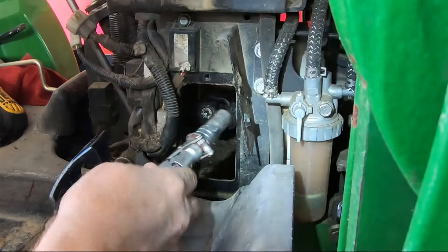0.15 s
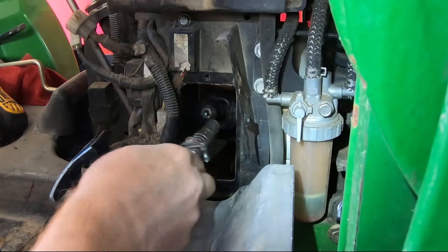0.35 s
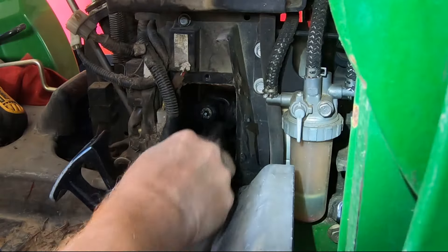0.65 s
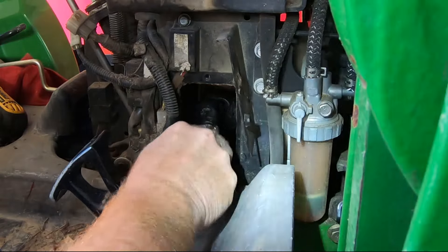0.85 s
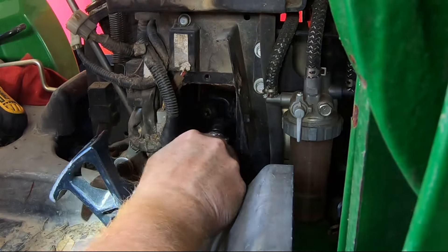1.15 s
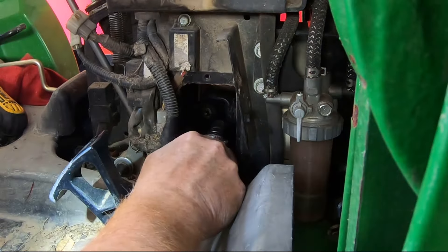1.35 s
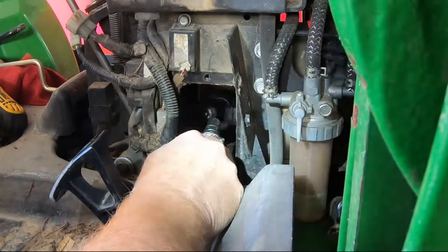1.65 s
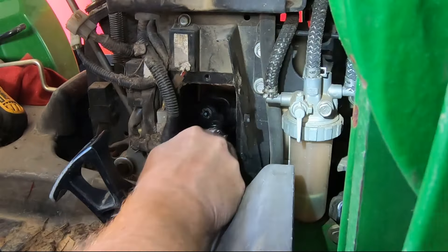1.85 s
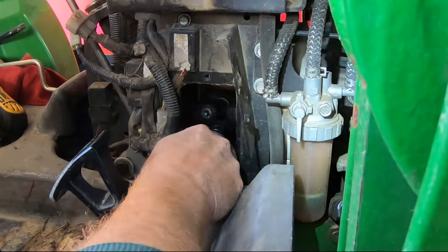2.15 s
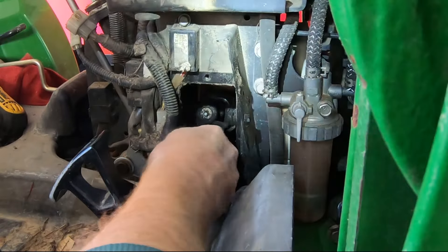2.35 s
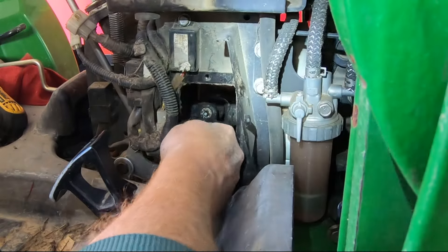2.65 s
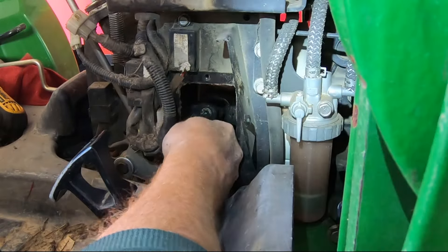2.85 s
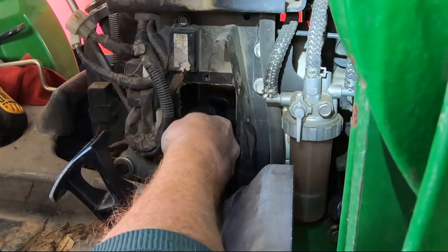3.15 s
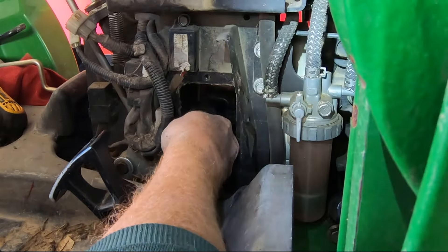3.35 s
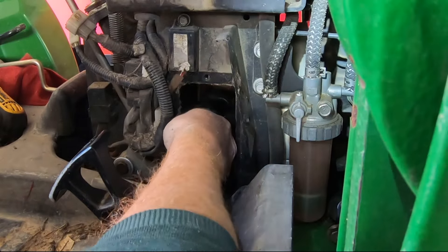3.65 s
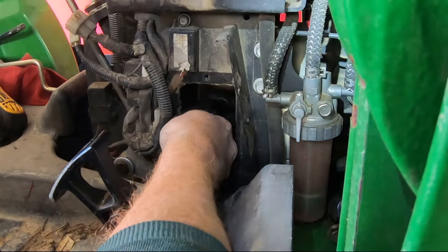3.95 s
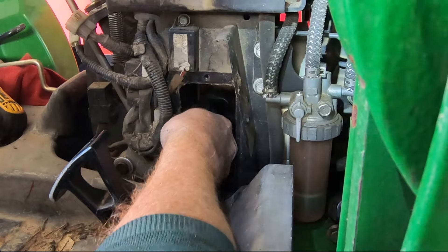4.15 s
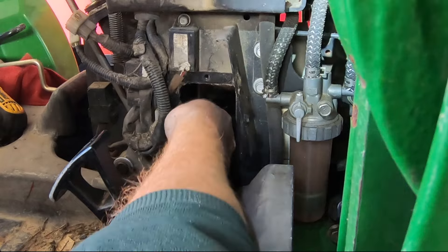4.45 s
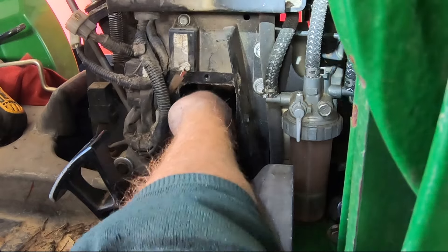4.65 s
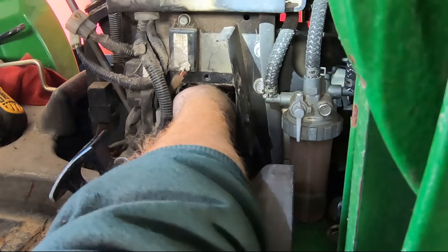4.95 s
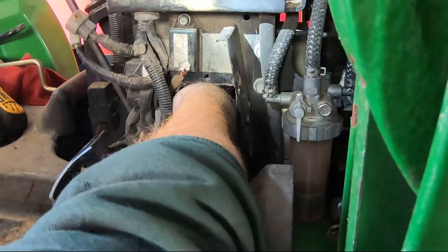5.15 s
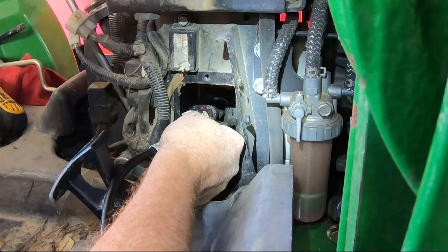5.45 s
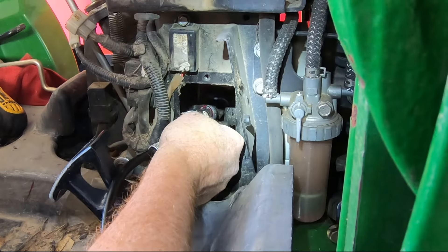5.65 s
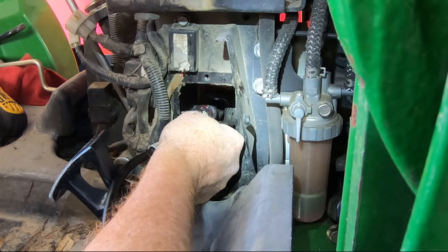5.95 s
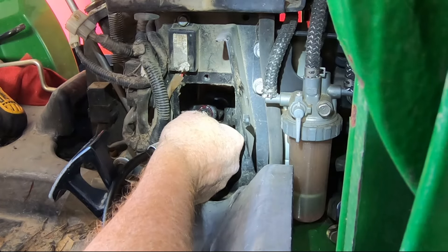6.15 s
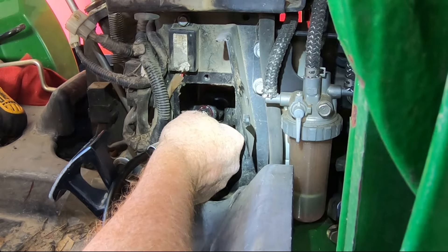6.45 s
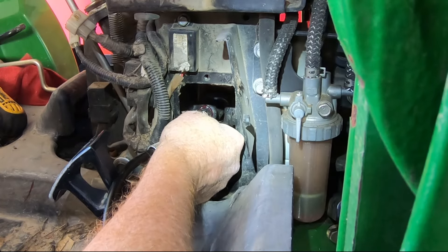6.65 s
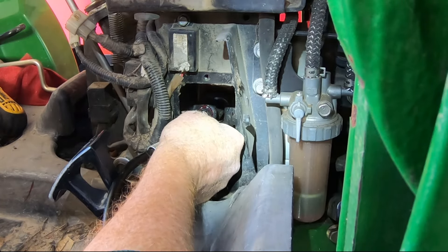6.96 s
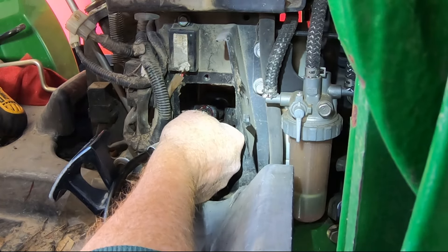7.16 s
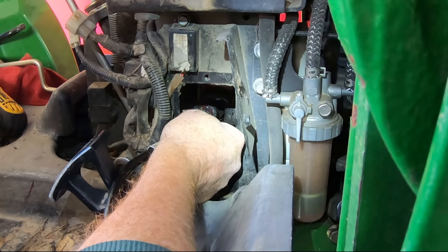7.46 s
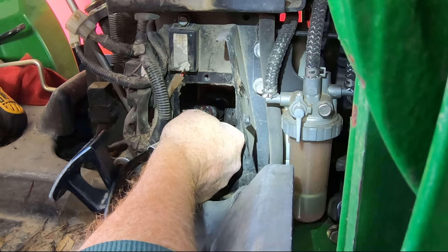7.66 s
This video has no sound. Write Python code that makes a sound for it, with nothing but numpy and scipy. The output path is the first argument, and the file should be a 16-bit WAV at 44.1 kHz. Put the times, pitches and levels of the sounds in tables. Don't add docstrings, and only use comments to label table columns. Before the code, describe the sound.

Soft skin and cloth rubs, small metal knocks and camera rumble, heavier on the right, sit over still indoor air. One hard steel snap stands out early, followed by sparse ticks. Later a geared electric motor bursts in, harsh and rattly, its pitch sagging and recovering with every knocking pump stroke, with squeal and hiss. It stops quickly with a short chatter and room echo; after a brief pause a second run begins and continues to the end.

```python
import sys
import numpy as np
from scipy import signal
from scipy.fft import rfft, irfft, next_fast_len
from scipy.io import wavfile
from scipy.ndimage import uniform_filter1d, map_coordinates

SR = 44100
rng = np.random.default_rng(int(sys.argv[2]) if len(sys.argv) > 2 else 0)


def generate_wav(signal):
    frames = np.transpose(np.atleast_2d(signal))
    scaled = np.clip(frames, -1, 1) * 32767
    pcm = np.round(scaled).astype(np.int16)
    wavfile.write(sys.argv[1], SR, pcm)


def makeup_ratio(level_db):
    decades = np.asarray(level_db, float) / 20
    return 10 ** decades


N = 343803

# [f/Hz, level/dB]
RUMBLE_COLOUR = [(9, -35.5), (15, -15), (32, 3.5), (55, -5), (80, 3.5), (95, -11), (118, -16), (180, -50.5),
                 (310, -120)]
AIR_COLOUR = [(59, -35.5), (100, -11.5), (166, 1.5), (243, -4), (507, -21), (790, -14.5), (1020, -23),
              (1370, -23), (1900, -33.5), (3180, -40), (4750, -34.5), (9320, -46.5), (15500, -74.5)]
# [t/s, rise/s, fall/s, level/dB, left minus right/dB]
JOLTS = [(0, .05, 0.071, -46.5, -13), (.13, 0.088, 0.13, -49.5, -11.5), (.91, 0.011, 0.19, -46, -9.5),
         (2.76, 0.063, 0.11, -57, -1), (3.06, 0.036, 0.062, -59, -4), (3.5, 0.22, 0.16, -53.5, -2),
         (3.951, 0.18, 0.18, -48.5, -8), (4.32, 0.019, 0.053, -47, -17.5), (4.82, 0.18, 0.23, -56.5, -2),
         (5.49, 0.038, 0.45, -54.5, -11.5), (5.97, 0.016, .06, -49.5, -5), (6.19, 0.056, 0.37, -54, -6.5),
         (7.14, 0.012, 0.18, -53.5, -10.5), (7.73, 0.039, 0.038, -52, -7)]
# [f/Hz, t60/s]
SHED_DECAY = [(200, 0.36), (700, 0.51), (1200, 0.45), (2600, 0.47), (5000, 0.4), (10000, 0.34)]

# [f/Hz, level/dB]
RUB_COLOUR = [(180, -42.5), (300, 4), (441, 3.5), (483, -0.5), (784, -4.5), (1490, -4.5), (1770, -8),
              (3200, -16.5), (4160, -45), (7040, -120)]
FIZZ_COLOUR = [(1470, -10), (2500, 0), (2940, -4), (3700, -3), (5360, -8), (6500, -7.5), (7500, -20.5),
               (9750, -45.5), (16500, -120)]
SHEEN_COLOUR = [(4120, -33.5), (7000, 3.5), (8570, 0.5), (10100, 2), (12000, -18.5), (13900, -15.5),
                (15500, -38.5)]
# [t/s, rise/s, fall/s, rub
# level/dB, fizz over rub/dB]
HAND_STROKES = [(.01, .05, 0.07, -59.5, -10), (4.4, .03, 0.032, -75, -7), (.14, 0.15, 0.17, -59.5, -3.5),
                (.42, 0.12, 0.4, -60, -3.5), (.6, 0.039, 0.073, -63.5, 9), (.7, 0.026, 0.035, -57.5, -8),
                (.92, 0.031, 0.059, -56, -13.5), (1.16, 0.022, 0.03, -40.5, -22),
                (1.31, 0.056, 0.15, -62.5, -3.5), (1.6, 0.063, 0.082, -58, -14),
                (1.71, 0.089, 0.16, -56.5, -7), (2.12, 0.31, 0.11, -55.5, -6),
                (2.39, 0.13, 0.14, -57.5, -5), (2.79, 0.15, 0.2, -56, -8.5), (2.963, 0.011, 0.037, -47, -7),
                (3.2, 0.48, 0.58, -66, -13.5), (3.27, 0.025, 0.035, -63, -8.5),
                (2.59, 0.077, 0.14, -65.5, -1.5), (3.58, 0.047, 0.28, -67.5, -7.5),
                (3.86, 0.029, 0.032, -81.5, 4), (4.28, 0.033, 0.037, -69, -11),
                (4.41, .04, 0.097, -73, -5.5), (4.58, 0.18, 0.3, -64, -8.5),
                (4.878, 0.043, 0.048, -56, -1.5), (5.11, 0.14, 0.25, -75.5, -26),
                (7.2, 0.11, 0.21, -75, -7)]
# [f/Hz, width/Hz, level/dB]
HOLLOW = [(800, 77, 4), (1256, 130, 0.5)]
# [t/s, level/dB]
SCUFFS = [(0.129, -45.5), (0.337, -47), (0.516, -45), (0.771, -48), (0.915, -48.5), (0.966, -51.5),
          (1.586, -53.5), (1.821, -55), (1.948, -54), (2.694, -56), (3.135, -52), (3.276, -55.5),
          (3.376, -56), (4.593, -53), (4.852, -49)]

# [t/s, level/dB, f/Hz, t60/s, left minus right/dB]
BUMPS = [(.127, -59, 500, 0.043, 3), (0.339, -47, 400, 0.041, 3), (.47, -48, 1640, 0.57, 3),
         (.572, -39, 950, 0.38, -3), (0.589, -40, 1860, 0.35, -5), (0.661, -45.5, 306, 0.065, 1),
         (.693, -46.5, 2000, 0.28, 4), (.775, -50.5, 696, 0.036, 10), (0.883, -50.5, 1630, 0.11, -4),
         (1.077, -51.5, 915, 0.071, 7), (1.698, -53, 6600, .02, 17), (2.022, -50, 4860, 0.018, 4.5),
         (3.5657, -43, 1820, 0.041, 7), (.89, -49.5, 142.3, .35, -6.5), (2.958, -45, 1360, 0.061, 4),
         (2.96, -39, 3200, 0.028, 2), (2.961, -43.5, 386, 0.093, -2), (3.455, -55, 5500, 0.018, 4),
         (3.565, -33.5, 3180, 0.025, 4.5), (3.623, -49, 1340, 0.033, -7), (3.834, -65, 4980, 0.022, -8),
         (4.5642, -47.5, 3250, 0.013, 2), (4.564, -49.5, 910, 0.025, 8), (2.813, -49, 5000, .02, 0),
         (5.027, -55.5, 3950, .022, -1)]
# [t/s, level/dB, f/Hz, t60/s]
TICKS = [(.195, -57, 5200, .03), (1.722, -49.5, 8400, 0.017), (3.074, -53.5, 3520, 0.015),
         (3.154, -62, 4990, 0.014), (3.206, -64, 3000, .018), (3.228, -55.5, 1980, 0.049),
         (3.305, -60, 3180, 0.037), (4.811, -53, 3990, 0.019)]
# [t/s, level/dB, f/Hz, t60/s]
STEEL_RINGS = [(1.125, -58, 3000, .02), (1.1378, -22, 1100, .03), (1.1385, -36, 4100, .03),
               (1.143, -40, 430, .05), (1.168, -39, 390, .13), (1.139, -35, 240, .05),
               (3.622, -52, 2370, .09), (3.5655, -40, 3420, .014), (3.5655, -50, 4400, .01),
               (3.845, -69, 2400, .12), (1.19, -42, 1520, .06), (1.48, -55, 900, .07),
               (4.8105, -60, 3600, .012), (4.8105, -60, 1320, .02), (5.027, -61, 4300, .012),
               (5.027, -62, 2400, .015), (3.455, -57, 4300, .015), (3.5657, -60, 9800, .02),
               (4.564, -51, 2400, .025), (.128, -50, 260, .05), (.655, -50, 270, .04)]
# [t/s, level/dB]
SNAP = [
    (1.138, -15.5),
]
# [f/Hz, level/dB]
CRACK_COLOUR = [(60, -41.5), (150, -7.5), (400, -9), (800, -6), (1300, 0), (1900, -7.5), (2400, -5.5),
                (4000, -12), (4700, -19), (6600, -29.5), (15000, -70.5)]
# [f/Hz, width/Hz, level/dB]
BRACKET = [(188.7, 480, -3), (405, 15, 8), (790, 70, -1), (1201, 120, -19.5), (1460, 68, -6),
           (2250, 380, -4)]

# [f/Hz, width/Hz, level/dB]
HOUSING = [(950, 110, 3), (1060, 39, 4.5), (1290, 200, -1), (1464, 19, 6), (1754, 27, 3), (2180, 130, 2.5),
           (2508, 40, 4), (2920, 36, -3), (3250, 100, 5.5)]
# [f/Hz, level/dB]
GEAR_COLOUR = [(150, -60), (250, -18), (330, -7.5), (600, -3.5), (1000, -1), (1500, -5), (3300, -6),
               (4000, -9.5), (5000, -14.5), (6000, -13.5), (10200, -24), (14200, -40), (15500, -65)]
STRAIN_COLOUR = [(2000, -38.5), (3500, 2), (4600, 1), (5400, 3.5), (6000, 0), (6350, -9), (6550, 7.5),
                 (6800, -9.5), (10000, -16), (15000, -32.5)]
KNOCK_COLOUR = [(250, -44.5), (400, 11.5), (600, 9.5), (1200, 4), (1500, 6.5), (2500, -6), (3300, -0.5),
                (7000, -25.5), (15000, -60.5)]
# [f/Hz, left minus right/dB]
GUN_ALIKE = [(60, 0.15), (150, 0.56), (380, 1), (950, 0.66), (2380, 0.93), (5980, 0.75), (15000, -0.3)]
GUN_PAN = [(60, -6.5), (150, 3), (380, -1), (950, -3), (2380, -1), (5980, -3), (15000, 6)]
# [on t/s, off t/s, spin-up/s, gear level/dB, extra whine as the load is taken up/dB]
PULLS = [
    (5.308, 6.631, .024, -32, 25),
    (7.33, 8, 0.018, -31.5, -2),
]
# [t/s, level/dB]
SWITCH_CLICKS = [(5.299, -55), (5.308, -25.5), (6.97, -57.5), (7.325, -34)]
# [t/s, level/dB]
CRANK_KNOCKS = [(5.645, -16), (5.871, -15.5), (6.089, -15), (6.307, -12.5), (6.526, -16.5), (7.503, -15),
                (7.727, -16)]
SILENT_TURNS = [5.19, 5.408, 6.746, 7.285, 7.95]
# [f/Hz, level/dB, t60/s]
FRAME_MODES = [(470, -18.5, .05), (685, -14, 0.047), (915, -13.5, 0.044), (1122, -10.5, 0.093),
               (1414, -8.5, .05), (2000, -15, 0.017)]
SHAFT_ORDERS = [1, 12, 15, 15, 10]
VOICE_LAGS = (0, .8, 1.2, 1.2, .4, 1.9)
# [rest level/dB, then peaks of (t after the knock/s, rise/s, fall/s, level/dB)]
VOICES = [
    (-66, (.165, .055, .035, -53)),
    (-68, (.16, .018, .012, -44), (.203, .016, .018, -39.5)),
    (-70, (.056, .018, .022, -44)),
    (-64, (.14, .025, .04, -46.5)),
    (-70, (.052, .014, .025, -44)),
    (-75, (.022, .012, .022, -36)),
]
# [pinion 12/dB, pinion 15 early/dB, pinion 15 late/dB, pinion 10/dB, squeal/dB]
TURN_MOODS = [(0, 0, 0, 0, 0), (-1, -9, -1, -9, 0), (-1, 0, -1, 0, 0), (0, -5, -4, -1, -1),
              (0, -5, 3, -5, -1), (-1, 0, 0, 0, -3), (-12, -3, -8, 0, 0), (0, 0, 0, 0, 0),
              (-18, -9, -8, -9, 0), (0, 3, -6, -4, -3), (0, -3, 0, -3, 0), (0, 0, 0, 0, 0)]
# [t after the knock/s, level/dB, f/Hz]
BACKLASH = [
    (.068, -21.5, 2226),
    (.091, -18, 1047),
]
# [t/s, level/dB, f/Hz]
LOOSE_CLACKS = [(5.356, -40, 1000), (5.387, -20.5, 3320), (5.44, -15, 3250), (5.455, -19.5, 1045),
                (6.017, -25, 1050), (7.39, -38.5, 970), (7.433, -19.5, 1110), (7.711, -15.5, 1060)]
# [t/s, level/dB, f/Hz]
TOOTH_CATCHES = [(5.365, -23, 930), (5.386, -22, 1000), (5.405, -14.5, 1030), (5.508, -16, 1110),
                 (5.531, -28, 939), (5.561, -23, 970), (5.595, -23, 1090), (5.646, -25, 1230),
                 (5.742, -10.5, 970), (5.78, -14, 970), (5.836, -36, 1030), (5.871, -28, 1090),
                 (5.959, -15, 1107), (6.0585, -10, 950), (6.09, -20, 1170), (6.152, -17, 1120),
                 (6.179, -12, 924), (6.274, -30.5, 1040), (6.308, -16, 1060), (6.364, -18.5, 1060),
                 (6.395, -23, 1105), (6.462, -29.5, 1020), (6.528, -25.5, 1090), (6.57, -23, 1400),
                 (6.586, -20.5, 1150), (6.611, -23.5, 1030), (7.381, -27.5, 915), (7.395, -34, 970),
                 (7.505, -24, 1260), (7.598, -23, 1090), (7.625, -19, 940), (7.671, -30, 1010),
                 (6.59, -24, 1500), (6.607, -23, 1780), (6.625, -24, 1800), (6.64, -29, 1450),
                 (6.645, -30, 1800)]
BRIGHT_CATCHES = [(5.3482, -38, 2200), (5.3652, -20, 2200), (5.5224, -20, 3110), (5.6067, -30, 3420),
                  (5.6486, -21, 2920), (5.7194, -15, 2190), (5.8701, -18, 3250), (5.9863, -26, 3240),
                  (6.068, -24.5, 3240), (6.0918, -18.5, 3170), (6.1539, -16.5, 2180), (6.3096, -14, 3250),
                  (6.5285, -22, 3200), (6.5904, -16, 2200), (6.6114, -15.5, 3250), (7.51, -17, 3210),
                  (7.5787, -12, 2170), (7.6144, -20, 2980)]


def unit(x):
    return x / np.sqrt(np.mean(x ** 2) + 1e-20)


def along(points, hz):
    f, v = np.transpose(points)
    return np.interp(np.log(hz + 1), np.log(f + 1), v)


def wobble(rate):
    knots = rng.standard_normal(int(N * rate / SR) + 4)
    return map_coordinates(knots, [np.arange(N) * rate / SR])


def filtered(x, response):
    m = next_fast_len(x.shape[-1] + 8192)
    return irfft(rfft(x, m) * response(np.fft.rfftfreq(m, 1 / SR)), m)[..., :x.shape[-1]]


def rush(gain, alike, grain_db=0, grain_hz=300, patchy_db=0):
    z = signal.stft(rng.standard_normal((2, N)), nperseg=512)[2]
    field = uniform_filter1d(rng.standard_normal(z.shape[1:]), 6, 0)
    field = uniform_filter1d(field, 10, 1)
    pair = signal.istft(z * makeup_ratio(patchy_db * unit(field)), nperseg=512)[1][:, :N]
    pair = pair * makeup_ratio(grain_db * wobble(grain_hz))

    def spread(hz):
        turn = np.arccos(np.clip(along(alike, hz), -1, 1)) / 2
        return gain(hz) * [np.cos(turn), np.sin(turn)]

    mid, side = filtered(pair, spread)
    return unit(np.array([mid + side, mid - side]))


def add(track, s, sound):
    part = track[..., round(s * SR):][..., :sound.shape[-1]]
    part += sound[..., :part.shape[-1]]


def burst(gain, t60, attack=0.0014):
    t = np.arange(SR // 4) / SR
    puff = filtered(rng.standard_normal(len(t)), gain)
    puff = puff * makeup_ratio(-60 * t / t60) * (1 - np.exp(-t / attack))
    return puff / np.abs(puff).max()


def ring(hz, t60, attack):
    t = np.arange(SR // 10) / SR
    return np.sin(2 * np.pi * hz * t) * makeup_ratio(-60 * t / t60) * (1 - np.exp(-t / attack))


def peak(hz, width):
    return lambda f: f * width / np.hypot(hz * hz - f * f, f * width)


def modes(rows, f):
    return sum(makeup_ratio(db) * peak(hz, width)(f) ** 2 for hz, width, db in rows)


def bell(x, at, rise, fall, edge=2):
    return np.exp(-np.abs((x - at) / np.where(x < at, abs(rise), abs(fall))) ** edge)


def swells(rows, db, rest_db, edge):
    t = np.arange(0, N / SR + .002, .002)
    power = makeup_ratio(rest_db) ** 2
    for row, level_db in zip(rows, db):
        power = power + (makeup_ratio(level_db) * bell(t, *row[:3], edge)) ** 2
    return np.interp(np.arange(N) / SR, t, np.sqrt(power))


def rumble():
    jolt_db, pan_db = np.transpose(JOLTS)[3:]
    ports = [swells(JOLTS, jolt_db - 0.5 + side * pan_db / 2, -69, 1.3) for side in (1, -1)]
    lumps = rush(lambda f: makeup_ratio(along(RUMBLE_COLOUR, f)), [(50, 0.11)], grain_db=-0.5, grain_hz=10)
    return np.array(ports) * lumps


def shed_air():
    t = np.arange(N) / SR
    alike = [(150, 0.82), (300, 0.11), (2000, 0.12), (8000, 0.23)]
    air = rush(lambda f: makeup_ratio(along(AIR_COLOUR, f)), alike, grain_db=0.7, grain_hz=10.0, patchy_db=1.2)
    level_db = -59.5 + 0.5 * wobble(1.7)
    level_db += 2.5 * bell(t, 0.74, 1.9, .7)
    level_db -= bell(t, 4.03, 0.26, 0.32)
    level_db -= 4.5 * bell(t, 6.91, 0.24, 0.21)
    return makeup_ratio(level_db) * air


def shed(x):
    hz, t, z = signal.stft(rng.standard_normal((2, SR * 2 // 3)), SR, nperseg=256)
    tail = signal.istft(z * makeup_ratio(-60 * t / along(SHED_DECAY, hz)[:, None]), SR, nperseg=256)[1]
    late = np.pad(x, ((0, 0), (300, 0)))
    return signal.fftconvolve(late, tail / np.linalg.norm(tail[0]), axes=1)[:, :N]


def hollow(f):
    return 1 + modes(HOLLOW, f)


def hand():
    rub_db, over_db = np.transpose(HAND_STROKES)[3:]
    rub = rush(lambda f: makeup_ratio(along(RUB_COLOUR, f)) * hollow(f), [(500, 0.097), (3000, 0.074)],
               grain_db=1.5, grain_hz=95.5, patchy_db=1.45)
    fizz = rush(lambda f: makeup_ratio(along(FIZZ_COLOUR, f)), [(3000, 0.46)],
                grain_db=1.5, grain_hz=155.0, patchy_db=1.5)
    sheen = rush(lambda f: makeup_ratio(along(SHEEN_COLOUR, f)), [(9000, .3)],
                 grain_db=1.0, grain_hz=148.3, patchy_db=0.8)
    rest_db, edge = -92.5, 1.49
    rubbing = swells(HAND_STROKES, rub_db + 1.5, rest_db, edge)
    fizzing = swells(HAND_STROKES, rub_db + over_db + 2.0, rest_db - 8, edge)
    shine = makeup_ratio(-14 + 5 * bell(np.arange(N) / SR, 2.7, 0.48, 0.3))
    return rubbing * rub + fizzing * (fizz + shine * sheen)


def coupler_snap(out):
    def crack(f):
        return makeup_ratio(along(CRACK_COLOUR, f))

    for s, db in SNAP:
        add(out, s, makeup_ratio(db + 1.1) * burst(crack, 0.032, 0.00039))
        add(out, s, makeup_ratio(db - 11.5) * burst(lambda f: modes(BRACKET, f) + 0.1 * crack(f), 0.2, 0.00068))
        spray = [burst(lambda f: peak(3000, 3500)(f) ** 3, .26, .002) for port in range(2)]
        add(out, s, makeup_ratio(db - 18) * np.array(spray))


def steel():
    out = np.zeros((2, N))
    # pan in dB, band width over pitch
    contacts = [(*row, 0.8) for row in BUMPS] + [(*row, 7, 0.4) for row in TICKS]
    for s, db, hz, t60, pan_db, wide in contacts:
        tick = burst(lambda f: peak(hz, wide * hz)(f) ** 3 / (1 + (f / 13500) ** 4), max(t60, .005), 0.00028)
        add(out, s, makeup_ratio(db + pan_db / 2 * np.array([[1], [-1]])) * tick)
    for s, db, hz, t60 in STEEL_RINGS:
        add(out, s, makeup_ratio(db) * ring(hz, t60, 0.00032))
    for s, db in SCUFFS:
        add(out, s, makeup_ratio(db - 2) * burst(lambda f: hollow(f) ** 2 * peak(900, 900)(f), 0.034, .0006))
    coupler_snap(out)
    return out


def housing(f):
    return 1 + modes(HOUSING, f)


def gear_colour(f):
    return makeup_ratio(along(GEAR_COLOUR, f)) * housing(f)


def trigger(t):
    speed, level_db, extra_db = np.full(N, .03), np.full(N, -120.), np.zeros(N)
    held, held_s, freed_s, brake_s = .912, .155, .05, 0.074
    for on, off, spin, db, sing_db in PULLS:
        u = np.maximum(t - on, 0)
        stop = np.clip((t - off) / brake_s, 0, 1)
        share = held * (1 - np.exp(-u / spin))
        share += .035 * bell(u, .112, .03, .025)
        share += (1 - held) * np.clip((u - held_s) / freed_s, 0, 1)
        share *= 1 - stop
        speed = np.maximum(speed, share)
        level_db = np.maximum(level_db, db + 24 * np.log10(share + 1e-9) - 32 * stop ** 2)
        singing = bell(u, .125, .028, .045, 4) if sing_db > 0 else u * (u < held_s) > 0
        unmeshed = u * (u < .1) > 0
        extra_db += sing_db * singing - 20 * unmeshed
    return speed, level_db, extra_db


def turning(since, at, rise, fall):
    return bell(since, at, rise, fall) + bell(since - .22, at, rise, fall)


def gear_noise(since, speed, level_db):
    shake = rush(gear_colour, GUN_ALIKE, grain_db=1.4, grain_hz=255.1, patchy_db=1.8)
    strain = rush(lambda f: makeup_ratio(along(STRAIN_COLOUR, f)), [(5000, 0.24)],
                  grain_db=1.0, grain_hz=400, patchy_db=2.5)
    dull = filtered(shake, lambda f: 1 / (1 + (f / 2200) ** 4))
    bass = filtered(dull, lambda f: 1 / (1 + (f / 760) ** 4))
    bright = np.minimum(speed / 0.89, 1) ** 4 * (shake - dull)
    shake = makeup_ratio(1.5 * wobble(130)) * (dull - (1 - speed ** 6.8) * bass) + bright
    rattle_db = 2.5 + turning(since, 0, 0.0066, 0.0064)
    hiss_db = 1.5 + 10.5 * turning(since, 0.018, 0.017, .045)
    rattle = makeup_ratio(level_db + rattle_db + 0.31 * wobble(40)) * shake
    return rattle + makeup_ratio(level_db - 10.5 + hiss_db) * speed ** 3 * strain


def shaft_voices(t, marks, since, speed, level_db, extra_db):
    shaft_hz = 346 - 20 * bell(since, .1, .03, .06)
    squeal_hz = 5740 - 620 * bell(since, .062, .026, .1)
    jitter = (.0012 + .00022 * np.maximum(extra_db, 0)) * wobble(200)
    turns = np.cumsum(shaft_hz * speed * (1 + jitter)) / SR
    slips = np.cumsum(squeal_hz * (1 + .009 * wobble(350))) / SR
    turn = np.maximum(np.searchsorted(marks, t) - 1, 0)
    moods_db = uniform_filter1d(np.transpose(TURN_MOODS)[:, turn] * 1., SR // 50)
    lifts_db = (-400 * abs(1 - speed),
                np.minimum(extra_db, 0) + moods_db[0],
                moods_db[1] - abs(extra_db),
                extra_db + moods_db[2],
                moods_db[3] - abs(extra_db),
                moods_db[4] - abs(extra_db))
    phases = [*np.outer(SHAFT_ORDERS, turns), slips]
    out = np.zeros((2, N))
    for cycles, (rest_db, *peaks), lift_db, lag in zip(phases, VOICES, lifts_db, VOICE_LAGS):
        voice = makeup_ratio(rest_db) + sum(makeup_ratio(db) * turning(since, *shape) for *shape, db in peaks)
        flutter_db = 2 * np.array([wobble(110), wobble(110)])
        size = voice * makeup_ratio(lift_db + level_db + 40 + flutter_db)
        out += size * np.sin(2 * np.pi * cycles + np.array([[0], [lag]]))
    return out


def crank_knocks(out):
    for s, db in CRANK_KNOCKS:
        thud = burst(lambda f: makeup_ratio(along(KNOCK_COLOUR, f)) * housing(f), 0.14, 0.00041)
        add(out, s, makeup_ratio(db - 5) * thud)
        for hz, level_db, t60 in FRAME_MODES:
            mode = ring(hz * rng.normal(1, 0.014), t60, 0.00094)
            add(out, s, makeup_ratio(db + level_db + rng.normal(0, 2.5)) * mode)


def gear_clacks(out):
    clacks = [(knock + late, db, hz) for knock, _ in CRANK_KNOCKS for late, db, hz in BACKLASH]
    for s, db, hz in clacks + LOOSE_CLACKS:
        clack = burst(lambda f: peak(hz, 500)(f) ** 2 + 0.15 * gear_colour(f), 0.037, 0.0008)
        add(out, s, makeup_ratio(db - 3.5 + rng.normal(0, 0.88)) * clack)
    for s, db, hz in TOOTH_CATCHES:
        add(out, s, makeup_ratio(db - 8) * ring(hz, .05, 0.0009))
    for s, db, hz in BRIGHT_CATCHES:
        add(out, s, makeup_ratio(db - 5.5) * ring(hz, 0.031, 0.0009))


def switch_clicks(out):
    def click(f):
        return gear_colour(f) / (1 + (f / 6500) ** 5) / (1 + (800 / (f + 1)) ** 4)

    for s, db in SWITCH_CLICKS:
        add(out, s, makeup_ratio(db - 1.5) * burst(click, 0.044, 0.00084))


def gun():
    t = np.arange(N) / SR
    marks = np.sort(np.r_[np.array(CRANK_KNOCKS)[:, 0], SILENT_TURNS])
    since = np.interp(t, marks, np.arange(len(marks))) % 1 * .22
    speed, level_db, extra_db = trigger(t)
    out = gear_noise(since, speed, level_db)
    out += shaft_voices(t, marks, since, speed, level_db, extra_db)
    crank_knocks(out)
    gear_clacks(out)
    switch_clicks(out)
    return filtered(out, lambda f: makeup_ratio(along(GUN_PAN, f) / 2 * [[1], [-1]]))


def scene():
    def echo_colour(f):
        return housing(f) ** -0.7 * f * f / (f * f + 1100 ** 2) * (1 + .6 * peak(2800, 1200)(f))

    motor, contacts = gun(), steel()
    echo = shed(makeup_ratio(-4.0) * filtered(motor, echo_colour) + makeup_ratio(-9.5) * contacts)
    return motor + contacts + echo + hand() + rumble() + shed_air()


def band_limit(x):
    return signal.sosfilt(signal.butter(12, 15610, fs=SR, output="sos"), x)


def record(dry):
    dropout = bell(np.arange(N) / SR, 5.29, 0.0055, 0.005, 5.0)
    mix = dry * makeup_ratio(-34 * dropout)
    return band_limit(mix)


dry = scene()
out = record(dry)
generate_wav(out)
```